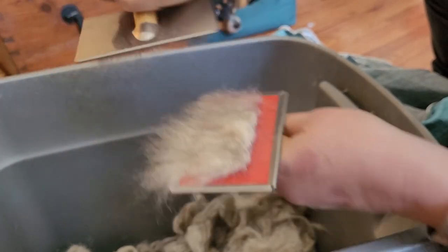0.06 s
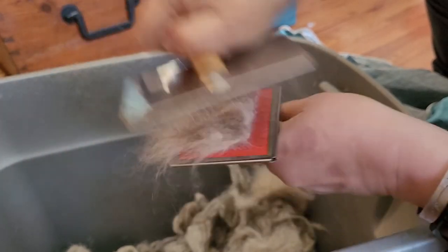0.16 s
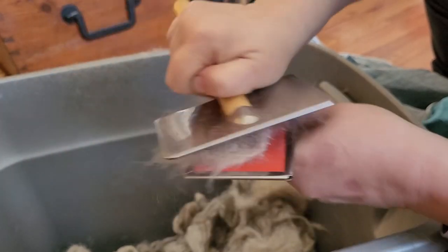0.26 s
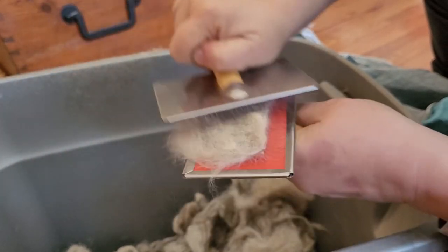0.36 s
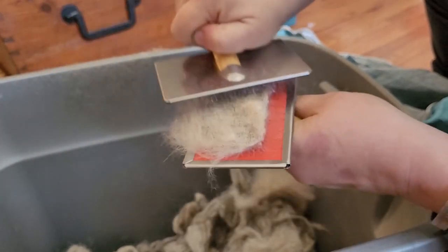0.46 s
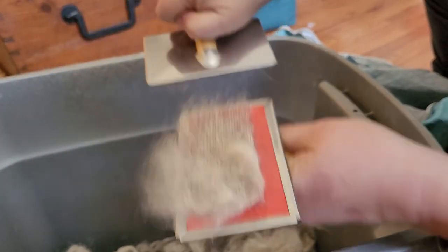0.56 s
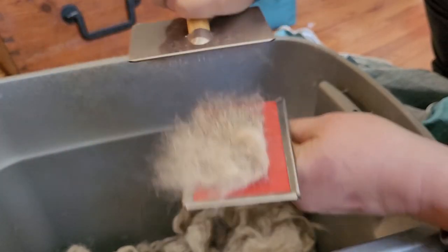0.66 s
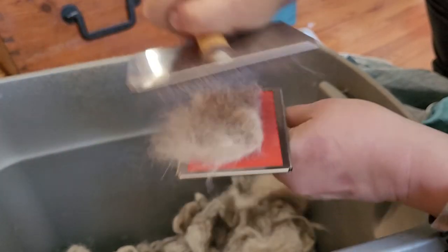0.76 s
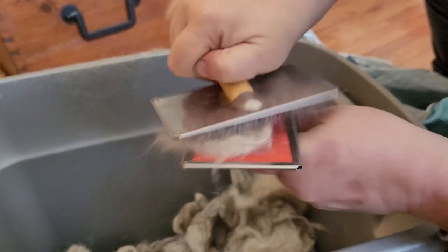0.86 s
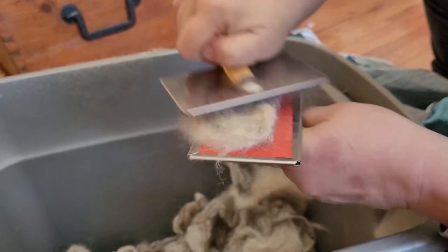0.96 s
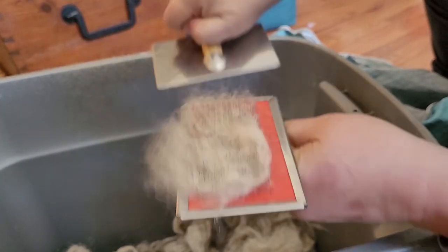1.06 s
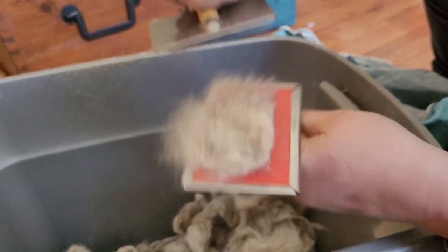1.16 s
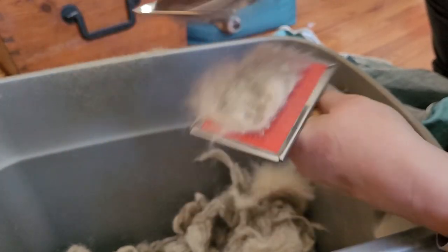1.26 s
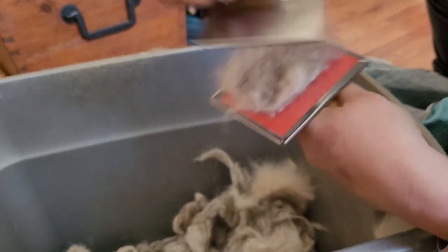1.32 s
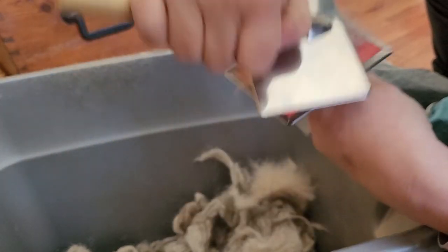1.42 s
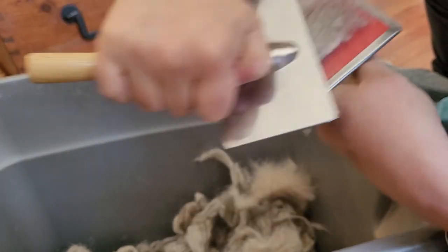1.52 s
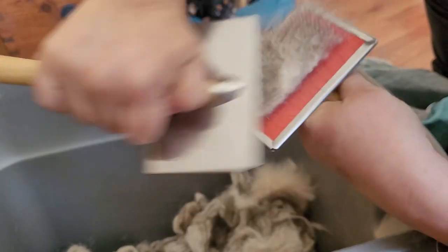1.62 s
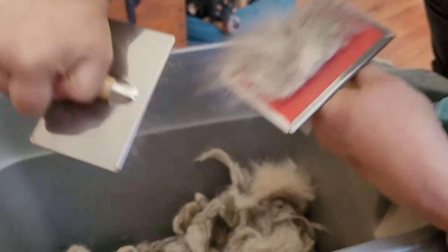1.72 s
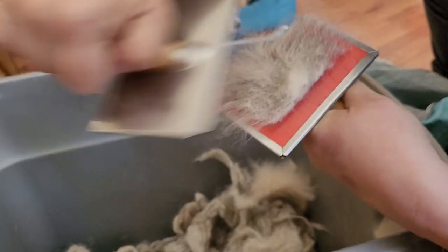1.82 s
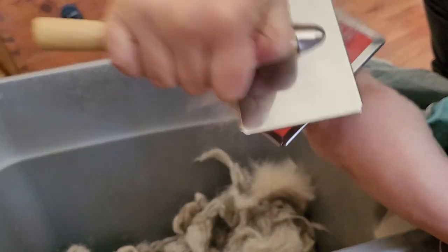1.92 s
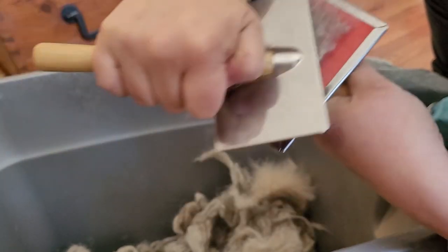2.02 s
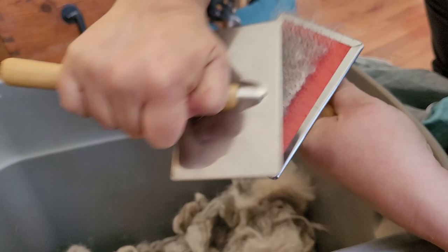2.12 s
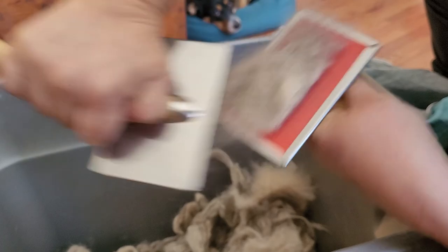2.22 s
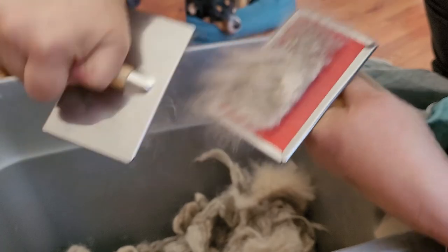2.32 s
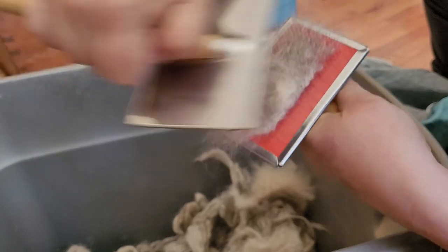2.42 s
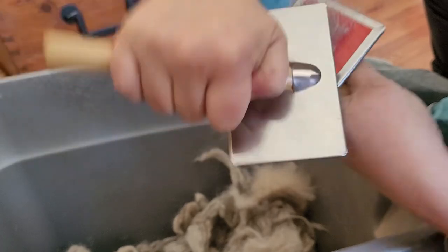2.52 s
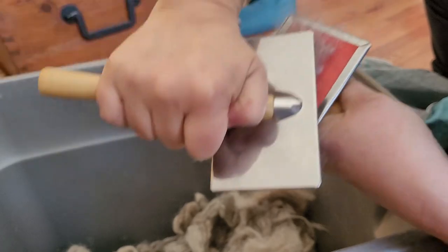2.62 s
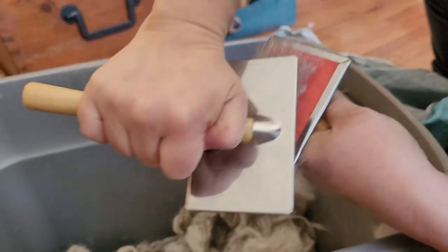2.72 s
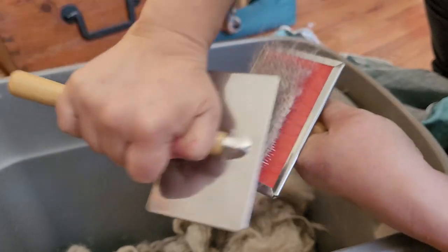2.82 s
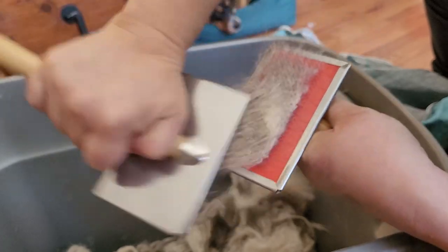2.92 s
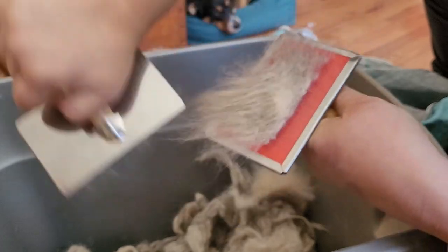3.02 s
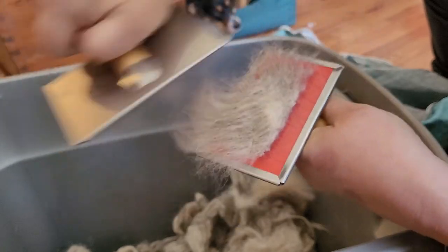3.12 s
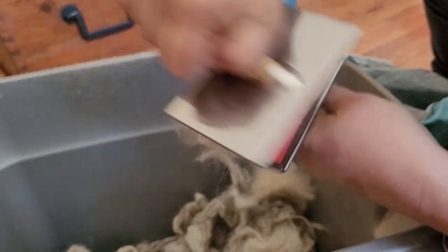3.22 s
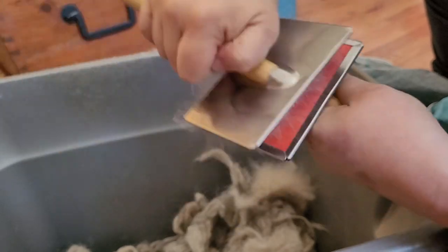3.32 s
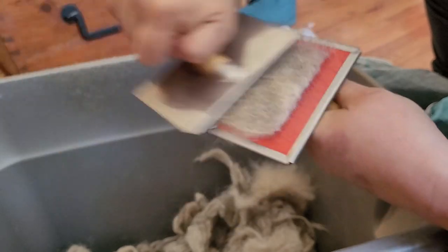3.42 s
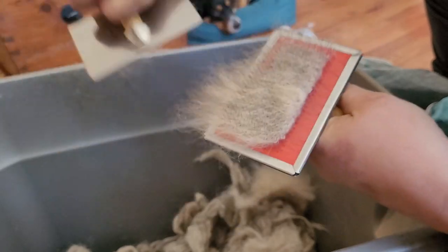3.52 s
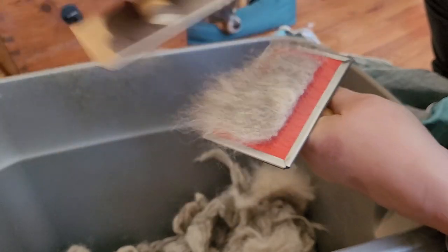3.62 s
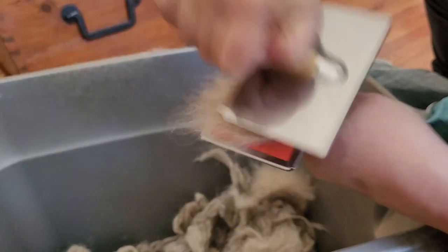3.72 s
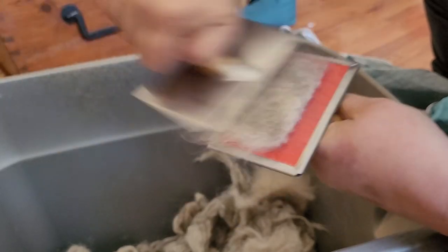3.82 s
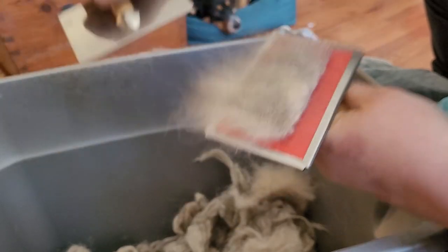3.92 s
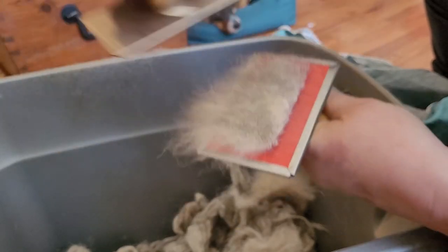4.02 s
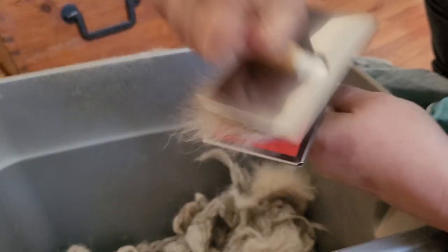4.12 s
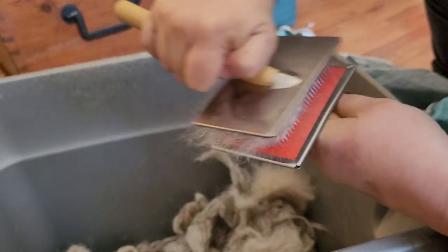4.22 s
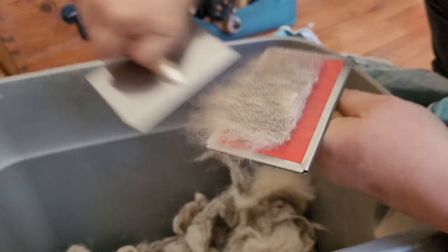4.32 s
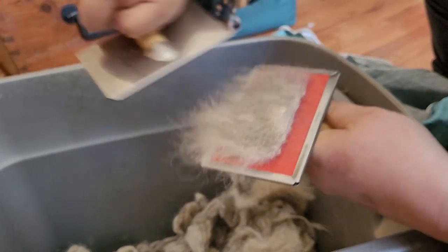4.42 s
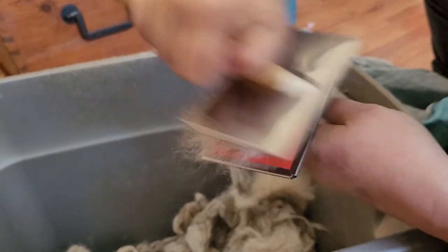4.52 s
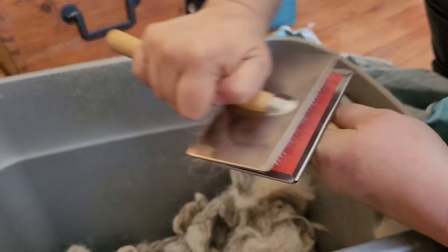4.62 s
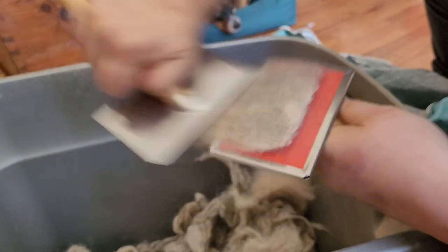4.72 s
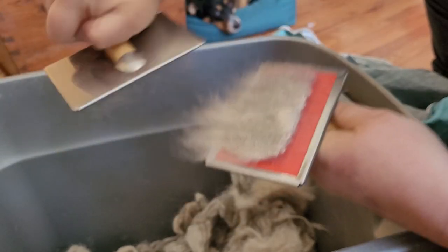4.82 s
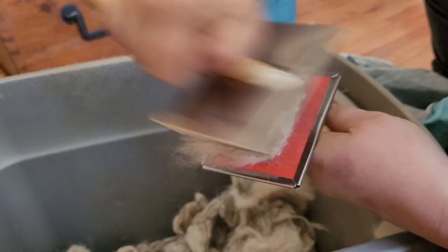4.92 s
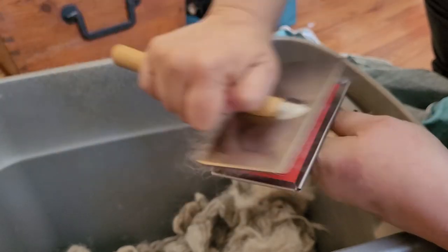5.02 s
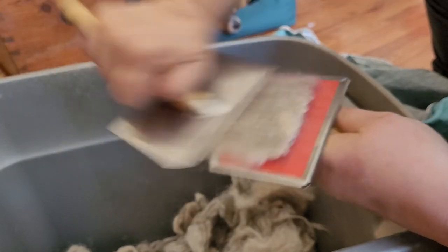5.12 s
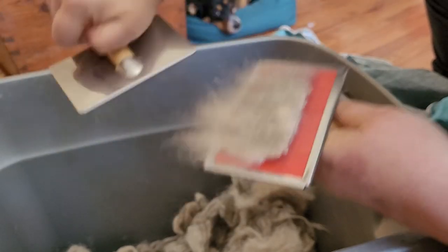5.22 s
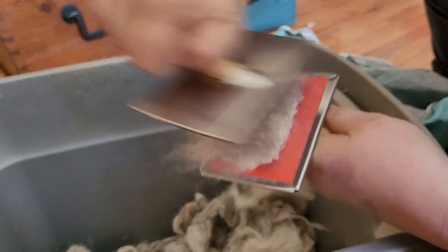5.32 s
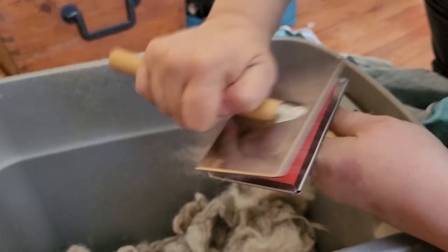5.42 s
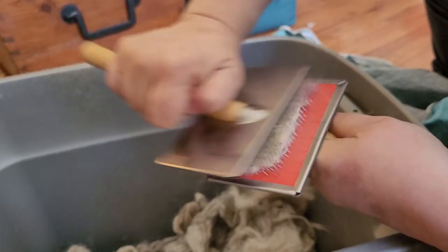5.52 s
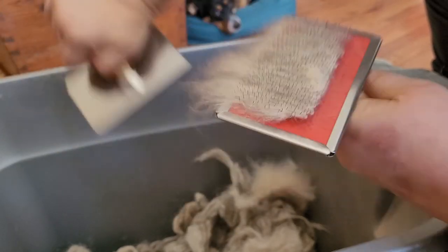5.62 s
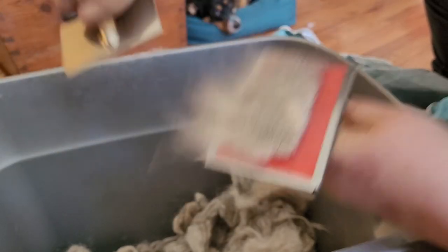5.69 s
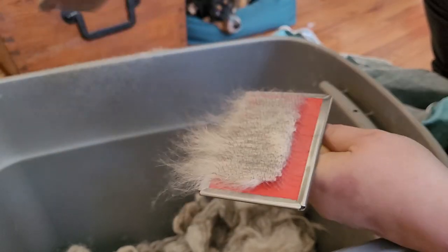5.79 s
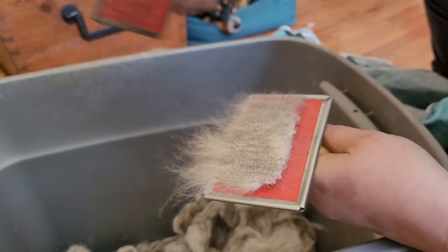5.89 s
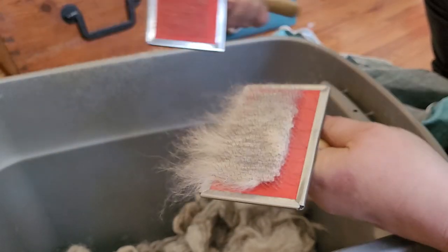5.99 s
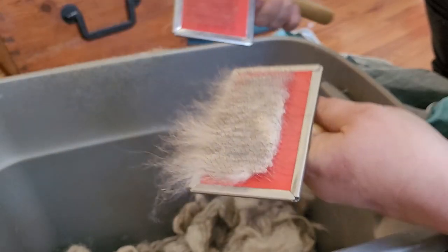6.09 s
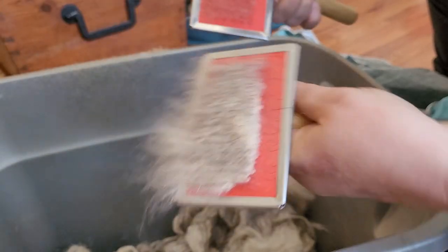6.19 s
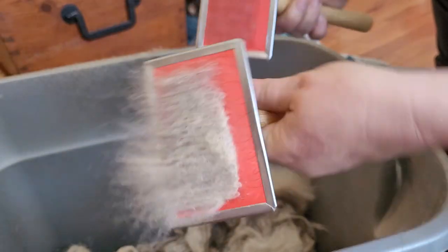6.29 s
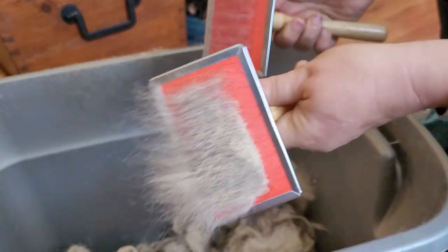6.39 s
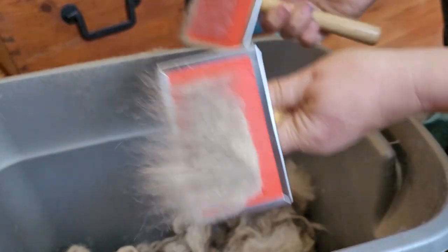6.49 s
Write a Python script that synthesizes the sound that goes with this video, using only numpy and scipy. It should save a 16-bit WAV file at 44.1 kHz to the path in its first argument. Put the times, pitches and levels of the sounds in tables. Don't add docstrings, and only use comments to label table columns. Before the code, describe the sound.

Two wire-toothed hand carders rasp against each other through fur in twelve scratchy strokes, then a tub knock and tiny metallic pings, in a quiet room.

```python
import sys
import numpy as np
from scipy import signal
from scipy.fft import rfft, irfft, next_fast_len
from scipy.io import wavfile
from scipy.ndimage import uniform_filter1d, map_coordinates

SR = 44100
rng = np.random.default_rng(int(sys.argv[2]) if len(sys.argv) > 2 else 0)


def voltage_ratio(decibels):
    exponent = np.asarray(decibels, float) / 20
    return 10 ** exponent


def transcribe(u):
    v = np.clip(np.atleast_2d(u).T, -1, 1)
    q = np.round(v * 32767).astype(np.int16)
    wavfile.write(sys.argv[1], SR, q)


N = 288855


def unit(x):
    return x / np.sqrt(np.mean(x ** 2) + 1e-20)


def along(points, hz):
    f, v = np.transpose(points)
    return np.interp(np.log(hz + 1), np.log(f + 1), v)


def wobble(rate):
    knots = rng.standard_normal(int(N * rate / SR) + 4)
    return map_coordinates(knots, [np.arange(N) * rate / SR])


def place(track, start, sound):
    track[..., start:start + sound.shape[-1]] += sound


def sine(hz, t, shake=0):
    return np.sin(2 * np.pi * hz * t + shake)


def filtered(x, response):
    m = next_fast_len(N + SR // 2)
    return irfft(rfft(x, m) * response(np.fft.rfftfreq(m, 1 / SR)), m)[..., :N]


def resonant(x, modes, order=1):
    def body(f):
        total = 0
        for k, (centre, width, db) in enumerate(modes):
            loss = 1j * f * width
            total = total + (-1) ** k * voltage_ratio(db / order) * loss / (centre * centre - f * f + loss)
        return total
    return filtered(x, lambda f: body(f) ** order)


def spread(pair, alike, lag):
    def mix(hz):
        turn = np.arccos(np.clip(along(alike, hz), 0, 1)) / 2
        return np.cos(turn), np.sin(turn), np.exp(-1j * np.pi * hz * lag / SR)

    def shared(hz):
        common, _, delay = mix(hz)
        return common * np.array([delay, 1 / delay])

    def opposed(hz):
        _, differing, delay = mix(hz)
        return differing * np.array([delay, -1 / delay])
    return filtered(pair[0], shared) + filtered(pair[1], opposed)


def leaned(x, lean):
    return filtered(x, lambda hz: voltage_ratio(along(lean, hz) * np.array([[.5], [-.5]])))


def slips(rate, scatter_db, clump_db, fibre):
    chance, size = rng.random((2, N)), rng.standard_exponential((2, N))
    noise = rng.standard_normal((2, N))
    releases = (chance < rate / SR) * np.sign(noise) * voltage_ratio(np.minimum(scatter_db * size, 14))
    return voltage_ratio(clump_db * wobble(120)) * (unit(releases) + fibre * noise)


# frequency in Hz, level in dB per Hz.
RUMBLE = [(13, -87.5), (22, -13), (156, -7), (190, -19.5), (241, -5.5), (381, -14), (416, -3), (564, -7),
          (629, -11.5), (1010, -14), (2170, -27), (2370, -29), (4000, -41), (5200, -66), (8800, -120)]
# frequency in Hz, width in Hz, level in dB.
DRONE = [(166.3, 3.9, -67.5), (293, 10.1, -67), (420.2, 5.2, -66.5), (432.6, 27, -64.5), (534, 27, -68)]
# frequency in Hz, width in Hz, level in dB.
MACHINE_HISS = [(2785, 500, 0)]
# frequency in Hz, left-right likeness from 0 to 1.
FAR = [(30, 0.81), (120, 0.86), (600, 0.83), (1500, 0.12), (4000, 0.0392)]


def hum():
    rumble = unit(filtered(rng.standard_normal((2, N)), lambda hz: voltage_ratio(along(RUMBLE, hz))))
    lines = sum(voltage_ratio(db) * unit(resonant(rng.standard_normal((2, N)), [(hz, width, 0)]))
                for hz, width, db in DRONE)
    hiss = voltage_ratio([[-76], [-86]]) * unit(resonant(rng.standard_normal((2, N)), MACHINE_HISS, order=2))
    rumble_db = -57 + 0.56 * wobble(6.0)
    return spread(voltage_ratio(rumble_db) * rumble + lines, FAR, lag=5.5) + hiss


# frequency in Hz, t60 in seconds.
WALLS = [(200, 0.15), (2000, 0.23), (6000, 0.2), (14000, 0.16)]


def room(x):
    out, step = np.zeros((2, N + 2 * SR)), 16384
    for k in range(0, N, step):
        hz, t, z = signal.stft(rng.standard_normal((2, SR // 2)), SR, nperseg=256)
        fade = voltage_ratio(-60 * t / along(WALLS, hz)[:, None])
        tail = signal.istft(z * fade, SR, nperseg=256)[1]
        wet = signal.fftconvolve(x[None, k:k + step], tail / np.linalg.norm(tail[0]), axes=1)
        place(out, k + 300, wet)
    return out[:, :N]


# frequency in Hz, level in dB per Hz.
FUR = [(1940, -31.5), (3300, -6), (3770, -7.5), (4940, -2.5), (5790, -7.5), (7010, -3.5), (9190, -15),
       (11500, -6), (16000, -23)]
# moment in seconds, peak in dB, fading in dB per second.
SWINGS = [(0, -74, 45), (.65, -79, 22), (1.15, -81, 14), (1.45, -75, 29), (1.801, -73, 60),
          (2.35, -74.5, 65), (3.1, -77.5, 30), (3.58, -73, 54), (4.0, -76.5, 22), (4.448, -74.5, 28),
          (4.88, -71, 96), (5.25, -67, 78), (5.83, -71.5, 65), (5.93, -76, 39), (6.04, -68, 89),
          (6.125, -73.5, 500), (6.25, -77, 70), (6.335, -70, 300), (6.55, -69.5, 55)]


def rustle():
    swell_db_per_s, still_db = 90.5, -91.5
    t = np.arange(0, N, 64) / SR
    level = voltage_ratio(still_db)
    for s, db, fading_db in SWINGS:
        level = level + voltage_ratio(db - np.maximum(swell_db_per_s * (s - t), fading_db * (t - s)))
    drag = slips(4000, 3.6, 1.9, fibre=2.4)
    whisper = filtered(drag, lambda hz: voltage_ratio(along(FUR, hz)))
    return np.repeat(level, 64)[:N] * unit(whisper)


# moment in seconds, tap peak in dB, boom share in dB.
KNOCKS = [
    (0.61, -47.5, -7),
    (0.756, -53, 22),
    (1.357, -17, 14),
    (5.792, -36.5, 5),
    (5.8566, -34.5, -11),
    (6.039, -53.5, 22.5),
]
# frequency in Hz, level in dB, t60 in seconds.
TUB = [(228.6, 16, 0.039), (188, -17.5, 0.3), (105, -15.5, 0.22), (402, 11, 0.019)]
# frequency in Hz, width in Hz, level in dB.
RIM = [(1140, 350, 2), (1730, 380, -4), (594, 225, 1.5), (2450, 700, -9)]
# frequency in Hz, width in Hz, level in dB.
SWAY = [(44.5, 48, -3.5), (101.8, 107, -4)]


def tub():
    push_s, push_db = 0.00018, 0.5
    tap, boom, shudder = np.zeros((3, N + SR))
    t = np.arange(SR // 2) / SR
    sag = .85 * t + 0.26 * 0.026 * (1 - np.exp(-t / 0.027))
    wall = sum(voltage_ratio(db - 60 * t / t60) * sine(hz, sag) for hz, db, t60 in TUB)
    wall *= 1 - np.exp(-(t / 0.009) ** 2)
    for s, db, boom_db in KNOCKS:
        start = round(s * SR) - 80
        tap_level = voltage_ratio(db - 1.0 - 60 * t / 0.038) + voltage_ratio(db - 17.5 - 60 * t / 0.28)
        place(tap, start, tap_level * rng.standard_normal(len(t)))
        place(boom, start, -voltage_ratio(db + push_db) * np.exp(-((t - .0024) / push_s) ** 2))
        place(boom, round((s + .006) * SR), -voltage_ratio(db + boom_db - 17.0) * wall)
        place(shudder, round((s + .01) * SR), voltage_ratio(db + boom_db - 40.5 - 60 * t / 0.58))
    shaking = shudder[:N] * unit(resonant(rng.standard_normal(N), SWAY, order=2))
    body = boom[:N] + shaking
    left = resonant(tap[:N], RIM) + body
    right = .5 * resonant(np.roll(tap[:N], 90), RIM) + .6 * np.roll(body, 60)
    return np.array([left, right])


# moment in seconds, click in dB, low ring in Hz,
# low ring share in dB, high ring share in dB.
PINGS = [(6.194, -65, 6330, -18, -8), (6.2053, -50, 6330, -36, -16), (6.231, -50, 6300, -3, -9),
         (6.238, -38.5, 6120, 2, -14), (6.2622, -48, 3900, -6, 5), (6.266, -50, 5950, 4, -12),
         (6.2821, -38, 5440, -12, -5), (6.2985, -47, 4480, 1, -16), (6.313, -37, 5600, -12, -17),
         (6.318, -48, 5100, 1.5, -14), (6.3335, -38.5, 5900, -3, -4), (6.339, -46, 4500, 1.5, -14),
         (6.3614, -55, 4330, 4, -15), (6.3819, -46, 6500, -10, 2), (6.3954, -63, 6100, -8, -14),
         (6.408, -73, 5190, 2, -15), (6.4632, -62, 6330, 10, 6), (6.523, -32.5, 4400, -8, -33)]


def pings():
    free_t60_s, damping = .08, .5
    out, clicks = np.zeros((2, 2, N + SR))
    t = np.arange(SR // 4) / SR
    for s, db, low_hz, low_db, high_db in PINGS:
        start = round(s * SR)
        t60 = free_t60_s * voltage_ratio(-damping * (db + 51))
        shake = np.cumsum(rng.standard_normal((2, len(t))), axis=1)
        flutter_db = 3.5 * sine(95, t, .04 * shake[0])
        ring = voltage_ratio(low_db - 60 * t / 0.034) * sine(low_hz, t, 0.11 * shake[0])
        ring += voltage_ratio(high_db - 60 * t / t60 + flutter_db) * sine(14600, t, .015 * shake[1])
        ring += voltage_ratio(-16 - 60 * t / .025) * sine(12100, t, 0.13 * shake[1])
        place(out, start, voltage_ratio(db) * ring * [[1], [.6]])
        place(clicks, start, voltage_ratio(db + 2.0 - 60 * t / 0.011) * rng.standard_normal((2, len(t))))
    # Hz, dB, t60 in seconds
    for hz, db, t60 in [(9200, -64, .2), (12800, -60, .2), (6100, -58, .08)]:
        place(out[0], round(6.523 * SR), voltage_ratio(db - 60 * t / t60) * sine(hz, t))
    wires = [(4640, 4200, -1.5), (6860, 2600, 4), (11700, 3800, -2.0), (15000, 2500, -10)]
    return out[:, :N] + resonant(clicks[:, :N], wires, order=2)


# moment in seconds, peak in dB, plucked plate mode in Hz.
PLUCKS = [(0.2313, -28.0, 1681), (0.344, -19.0, 1940.0), (0.431, -21.0, 2150.0), (0.507, -18.5, 1510.0),
          (0.5349, -14.5, 1660.0), (0.7181, -49, 7600.0), (0.8622, -26.0, 1660.0), (0.9727, -21, 1590.0),
          (1.0394, -15, 4930.0), (1.4839, -37.5, 1530.0), (1.522, -32, 1830.0), (1.6066, -24, 1680.0),
          (1.976, -30.0, 1700.0), (2.0412, -41.0, 1490.0), (2.0689, -34, 1660.0), (2.1196, -24, 1720.0),
          (2.133, -21, 1830.0), (2.2123, -18.0, 1610.0), (2.2596, -23, 4240.0), (2.5564, -35, 4540.0),
          (2.59, -39.0, 2000.0), (2.6081, -40, 4480.0), (2.6252, -38.0, 3770.0), (2.6517, -43, 1290.0),
          (2.6839, -34.0, 1920.0), (2.7018, -33.0, 1770.0), (2.712, -31, 1870.0), (2.7535, -27, 1700),
          (2.9011, -22, 1700.0), (3.2822, -22.5, 1780), (3.2897, -31.5, 11700), (3.3337, -22.0, 1810.0),
          (3.3798, -17.0, 1964), (3.3927, -19.0, 1895), (3.4761, -3, 2130.0), (3.765, -20, 2480),
          (3.7741, -11, 1870.0), (3.7873, -22.0, 1830.0), (3.8163, -12.0, 2690.0), (3.8582, -11.0, 5120.0),
          (4.168, -23, 1850.0), (4.1762, -18.5, 1920.0), (4.217, -20.0, 2430.0), (4.583, -37, 2580.0),
          (4.5856, -29, 1830.0), (4.6123, -18.5, 4800.0), (4.6208, -23.0, 2280.0), (4.6272, -12.5, 2150.0),
          (4.7057, -18.0, 1660.0), (4.7106, -16.0, 1460.0), (4.9954, -27.0, 2710.0),
          (5.0023, -24.5, 1290.0), (5.0096, -14.0, 1980), (5.048, -13, 1960.0), (5.087, -19, 1700.0),
          (5.3943, -32, 1680.0), (5.4054, -26, 1770.0), (5.4107, -26.5, 1270.0), (5.4513, -22.5, 1830.0),
          (5.5975, -7, 4180)]


def snaps():
    t60_s, rise_s, click_db = 0.0061, 0.00032, 9
    click_grows = .2
    blows, rings = np.zeros((2, 2, N))
    t = np.arange(900) / SR
    for s, db, mode_hz in PLUCKS:
        start = round(s * SR)
        blows[:, start] = voltage_ratio(db + click_db + click_grows * (db + 20.5)) * np.array([1, .5])
        ring = voltage_ratio(db + 4.5 - 60 * t / t60_s) * (1 - np.exp(-t / rise_s)) * sine(mode_hz, t)
        place(rings, start, ring * [[1], [.4]])
    upper = [(2900, 1500, -3.5), (4830, 1500, 1), (7000, 2000, -3), (11900, 3300, -11.5)]
    return rings + resonant(blows, upper)


# moment in seconds, peak in dB, decay t60 in seconds.
TOUCHES = [(0.223, -39, 0.05), (0.228, -24.5, 0.017), (0.856, -29, 0.017), (0.861, -26.5, 0.016),
           (1.481, -33, 0.034), (1.523, -31, 0.11), (1.975, -21.5, .022), (2.536, -27, 0.032),
           (3.28, -19.5, 0.03), (3.765, -13.5, 0.01), (3.773, -3, 0.011), (4.161, -31, 0.036),
           (4.167, -22, 0.028), (4.176, -16, 0.011), (4.583, -24.5, 0.018), (4.996, -21.5, 0.028),
           (5.008, -12, 0.014), (5.394, -33, 0.032), (5.402, -26, 0.019), (5.41, -19.5, 0.0085)]
# moment in seconds, peak in dB, wire share in dB.
CATCHES = [(0.256, -36, -2), (0.48, -21, -13), (.506, -21, -23), (.533, -24, -18), (.717, -51, -12),
           (1.5, -48, -11), (1.605, -26, -28), (2.069, -33, -26), (2.26, -28, -10), (2.493, -66, -4),
           (2.555, -31, -15), (2.59, -31, -23), (2.607, -40.5, -6), (2.623, -29, -25), (2.668, -35, -20),
           (2.683, -24.5, -22), (2.701, -28, -29), (2.711, -24, -28), (2.734, -33, -22), (3.29, -25, -8.5),
           (3.475, -3, -19), (3.591, -55.5, -1), (3.601, -53, -2), (3.858, -10, -8.5), (4.595, -31, -20),
           (4.611, -19.5, -12), (4.81, -62, -2), (4.935, -61, -4), (5.044, -21, -24), (5.305, -55, -11),
           (5.378, -56, -4), (5.596, -4.5, -26)]
# frequency in Hz, width in Hz, level in dB.
PLATE = [(1218, 1240, 0.5), (1603, 744, 5.5), (1855, 492, 4.5), (2775, 965, 0), (637, 177, 1.5)]
# frequency in Hz, width in Hz, level in dB.
UPPER = [(4320, 1430, -2.5), (6003, 1790, -0.5), (6903, 1666, -3)]
# frequency in Hz, width in Hz, level in dB.
WIRES = [(8230, 9000, -9.5), (11730, 2330, 11), (13700, 2600, 5.5), (15830, 1450, 3.5)]


def ticks():
    low, high = np.zeros((2, 2, N + SR))
    t = np.arange(4000) / SR
    contacts = [(s, db, -23, t60) for s, db, t60 in TOUCHES]
    contacts += [(s, db - 1, wire_db, 0.014) for s, db, wire_db in CATCHES]
    for s, db, wire_db, t60 in contacts:
        fall = voltage_ratio(-60 * t / max(t60, .004)) + 0.074 * voltage_ratio(-60 * t / 0.11)
        fall *= 1 - np.exp(-t / 0.0016)
        crush = unit(rng.standard_normal((2, len(t))) * fall) * np.sqrt(np.mean(fall ** 2))
        crush[:, 8] += voltage_ratio(4.5) * (0.013 / max(t60, .008)) ** 1.2 * np.array([1, .4])
        place(low, round(s * SR), voltage_ratio(db) * crush)
        place(high, round(s * SR), voltage_ratio(db + wire_db) * crush)
    return voltage_ratio(1.5) * resonant(low[:, :N], PLATE + UPPER) + voltage_ratio(3.0) * resonant(high[:, :N], WIRES)


# landing in seconds, drag in dB,
# grip in seconds, drag at the grip in dB.
RESTS = [(0.235, -47, 0.316, -45.5), (0.454, -53, 0.473, -45), (.868, -50.5, 0.91, -42),
         (1.488, -53.5, 1.582, -45.5), (1.985, -54, 2.035, -57), (2.549, -52, 2.59, -65.5),
         (3.295, -48, 3.316, -48), (3.78, -36, 3.794, -32.5), (4.182, -34, 4.187, -47.5),
         (4.589, -42, 4.64, -50), (5.013, -43, 4.97, -44), (5.414, -51.5, 5.445, -47)]
# teeth fully in, in seconds, scratch in dB, let-go in seconds, scratch in dB,
# flick of the wrist from 0 to 1.
PULLS = [(0.333, -31.5, 0.4, -28, 0.15), (.495, -32.5, 0.543, -31, 0.88), (.995, -30, 1.046, -30.5, 1.0),
         (1.632, -33, 1.682, -28.5, 0.99), (2.137, -31.5, 2.244, -32.5, 1),
         (2.765, -34.5, 2.994, -36.5, 0.63), (3.348, -30.5, 3.463, -27, 0.95),
         (3.818, -21, 3.862, -29.5, 1.01), (4.218, -28, 4.315, -24.5, 0.87),
         (4.63, -26, 4.731, -25.5, 0.83), (5.047, -26, 5.161, -29, 0.88),
         (5.457, -30.5, 5.586, -24.5, 0.81)]
# loudest plate region on entering in Hz, easing in mid-pull in dB,
# flare length in seconds, parting in dB per second.
FINISHES = [(2050, -2.5, 0.028, 310), (1800, .5, 0.031, 1000), (1680, -1, .035, 950),
            (1700, -0.5, 0.027, 893), (1750, -0.5, .022, 750), (1700, -2.5, 0.07, 1300),
            (1850, 1, 0.035, 750), (1910, 0.5, 0.031, 801), (1854, 3.5, 0.015, 657),
            (1850, 3, 0.029, 847.5), (1860, 0.5, 0.051, 760), (1790, 2, 0.072, 473)]
# upper plate in dB,
# wires in dB, handle in dB, share of the rise made early from 0 to 1.
HOLDS = [(1.5, .4, -0.5, 0.65), (0.9, -0.7, -0.5, 0.7), (-1, -.4, 0.8, 0.5), (-0.6, -2, 0.9, 0.48),
         (-0.2, -2.2, -0.5, 0.51), (-0.8, -0.6, 1, 0.3), (0.7, .1, -0.7, 0.55), (0.5, 0.3, -6, 0.49),
         (0, 2, 0.5, 0.46), (0.8, 1.3, 0.4, .52), (1, 3.5, 1.4, 0.36), (0.8, 1.2, -0.7, 0.55)]
RELEASE_S = .06


def controls():
    shares = [(-5.5, -5, -0.5, 7, 6.5),
              (-10.5, -10.5, -2.5, 14, 3.5),
              (-8, -17, 2, 4.5, 7.5)]
    rise_at, sag_at = 0.45, 0.47
    rest_hz, sinks, flare_hz = 1915, 0.94, 1752
    flare_dies_s = 0.023
    t, out = np.arange(N) / SR, np.full((5, N), -120.)
    out[4] = rest_hz
    for rest_row, pull, finish, hold in zip(RESTS, PULLS, FINISHES, HOLDS):
        land, land_db, grip, grip_db = rest_row
        bite, bite_db, go, go_db, flick = pull
        enter_hz, sag_db, flare, parting_db = finish
        *hold_db, done = hold
        on = (t >= land) & (t < go + RELEASE_S)
        times = [land, grip, grip + rise_at * (bite - grip), bite,
                 bite + sag_at * (go - bite), go, go + RELEASE_S]
        risen_db = grip_db + done * (bite_db - grip_db)
        eased_db = bite_db + sag_at * (go_db - bite_db) - sag_db
        parted_db = go_db - parting_db * RELEASE_S
        out[0, on] = np.interp(t[on], times,
                               [land_db, grip_db, risen_db, bite_db, eased_db, go_db, parted_db])
        stages = [grip, min(bite, go - flare - .005), go - flare, go, go + flare_dies_s]
        for k, (resting, base, *moves) in enumerate(shares):
            levels = [resting, base, *(base + flick ** 2 * np.array(moves))]
            out[k + 1, on] = np.interp(t[on], stages, levels) + hold_db[k]
        out[4, on] = np.interp(t[on], stages[1:4], [enter_hz, sinks * enter_hz, flare_hz])
    out[1:4] += [0.9 * wobble(35) for _ in range(3)]
    out[4] *= voltage_ratio(0.51 * wobble(30))
    return out


# first mode in Hz, share in dB, second mode in Hz, share in dB.
SUNG = [(2150, -15, 2850, -7), (2250, -6, 4500, -10.5), (1850, -9.5, 1300, -13), (1800, -8, 4250, -11),
        (1635, -12, 2500, -11), (1670, -12, 3900, -12), (1187, -11.5, 4400, -11), (2690, -7.5, 255, -12),
        (1870, -13, 4800, -12), (1198, -11, 4750, -10), (1885, -16, 2870, -11), (1700, -12, 2800, -10.5)]


def singing(drive, plate_db):
    width_hz, resting_db, let_go_db = 39, -9, -7
    out = np.zeros((2, N))
    for (land, _, grip, _), (bite, _, go, *_), (one_hz, one_db, two_hz, two_db) in zip(RESTS, PULLS, SUNG):
        on = slice(round(land * SR), round((go + RELEASE_S) * SR))
        fade_db = np.interp(np.arange(N)[on] / SR, [grip, bite, go], [resting_db, 0, let_go_db])
        for hz, db in (one_hz, one_db), (two_hz, two_db):
            b, a = signal.iirpeak(hz, hz / width_hz, SR)
            ring = unit(signal.lfilter(b, a, drive[:, on]))
            out[:, on] += voltage_ratio(plate_db[on] + db + fade_db) * ring
    return out


# frequency in Hz, width in Hz, level in dB.
HANDLE = [(250.7, 195, -2.5), (454, 1100, -1), (161.3, 180, -5.5)]


def carding():
    plate_db, upper_db, wire_db, handle_db, working_hz = controls()
    drive = slips(3000, 3.04, 0.65, fibre=0.82)
    plate, power = 0, 0
    for k, mode in enumerate(PLATE):
        hz, width, db = mode
        favour = voltage_ratio(-10.5 * np.abs(np.log2(working_hz / hz)))
        plate = plate + (-1) ** k * favour * resonant(drive, [mode])
        power = power + favour ** 2 * width * voltage_ratio(2 * db)
    plate = filtered(plate / np.sqrt(power), lambda hz: 1 / (1 + (650 / (hz + 1)) ** 4))
    parts = [(UPPER, upper_db, 0.4 * drive + slips(3500, 10.7, 0.94, fibre=0.328)),
             (WIRES, wire_db, 0.43 * drive + slips(4500, 3.58, 1.2, fibre=0.23)),
             (HANDLE, handle_db, slips(600, 4.9, 0.77, fibre=0.9)),
             (SWAY, -33, rng.standard_normal((2, N)))]
    out = uniform_filter1d(voltage_ratio(plate_db), size=120) * unit(plate)
    for modes, share_db, push in parts:
        level = uniform_filter1d(voltage_ratio(plate_db + share_db), size=120)
        out += level * unit(resonant(push, modes, order=2))
    return out + singing(drive, plate_db)


# frequency in Hz, left-right likeness from 0 to 1.
NEAR = [(50, .8), (150, 0.89), (350, 0.97), (650, 0.45), (1100, 0.79), (1700, 0.87), (2700, 0.12),
        (3600, 0.11), (15000, 0.082)]
# frequency in Hz, left over right in dB.
CARDER_LEAN = [(60, -2), (200, .8), (350, -1), (700, -0.5), (1000, 10.5), (1400, 0.5), (2050, -1),
               (2800, 4.5), (3500, 2), (5300, 2.5), (7500, 1), (11400, -2), (15300, 10)]
# frequency in Hz, left over right in dB.
FUR_LEAN = [(2000, 3.5), (2750, 27), (3600, 0), (7000, -3), (8500, -11.5), (11400, -14), (15000, -13)]


def scene():
    near = carding() + ticks() + snaps() + tub()
    loose = pings()
    echo = voltage_ratio(-18.5) * room(near[0] + 0.4 * loose[0])
    ports = leaned(spread(near, NEAR, lag=-2.86) + echo, CARDER_LEAN)
    ports += leaned(spread(rustle(), FAR, lag=0), FUR_LEAN)
    ports += spread(loose, NEAR, lag=3.8) * voltage_ratio([[-1.5], [1.5]])
    return ports + hum() * voltage_ratio([[-.6], [.6]])


def low_pass(x):
    return signal.sosfilt(signal.butter(12, 16830, fs=SR, output="sos"), x)


def record(dry):
    held = dry / (1 + np.abs(dry / .82) ** 6) ** (1 / 6)
    top_hz = 15750 + 80
    kept = filtered(held, lambda hz: voltage_ratio(-42 / (1 + np.exp((top_hz - hz) / 40))))
    return low_pass(kept)


dry = scene()
out = record(dry)
transcribe(out)
```